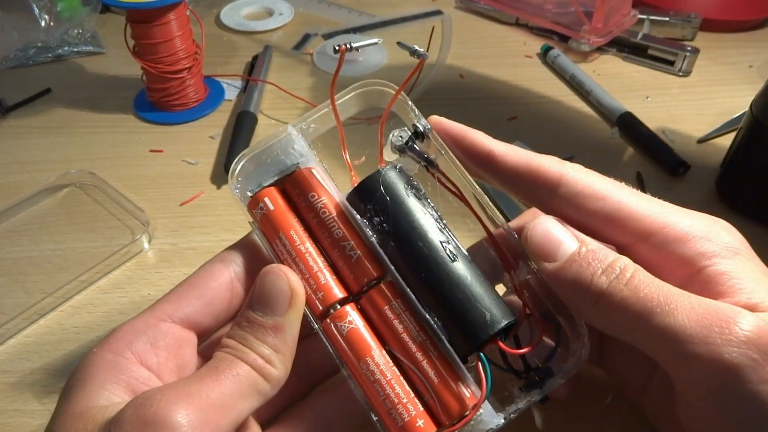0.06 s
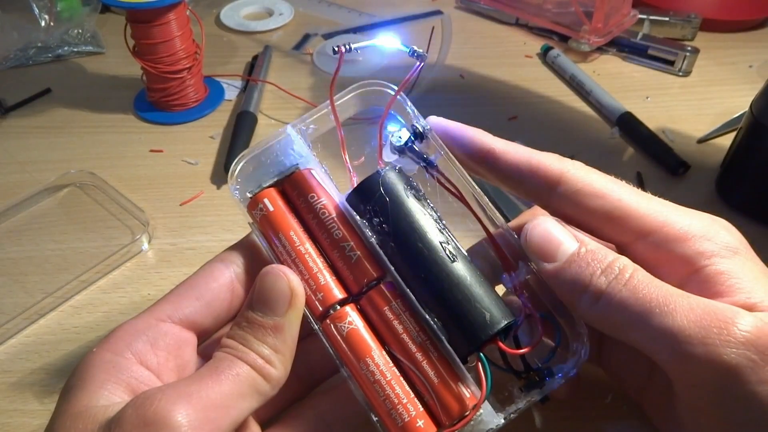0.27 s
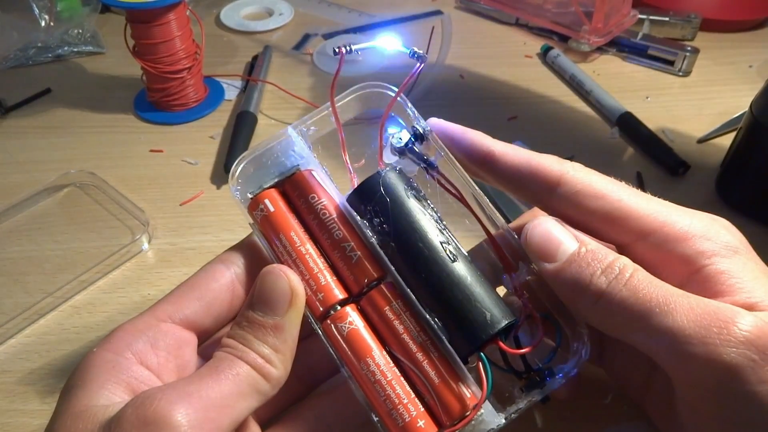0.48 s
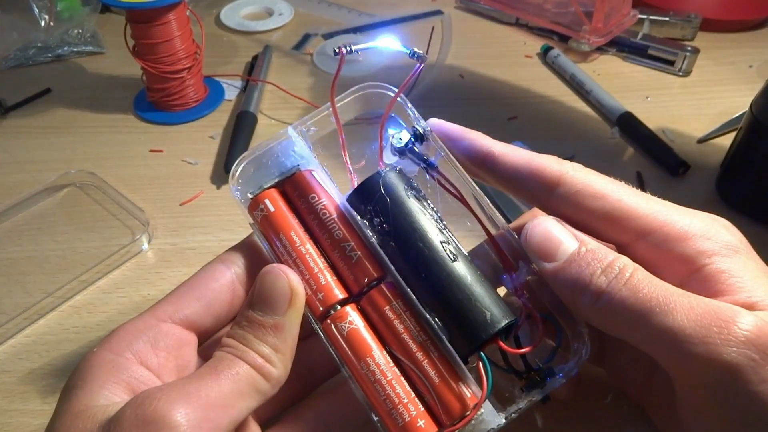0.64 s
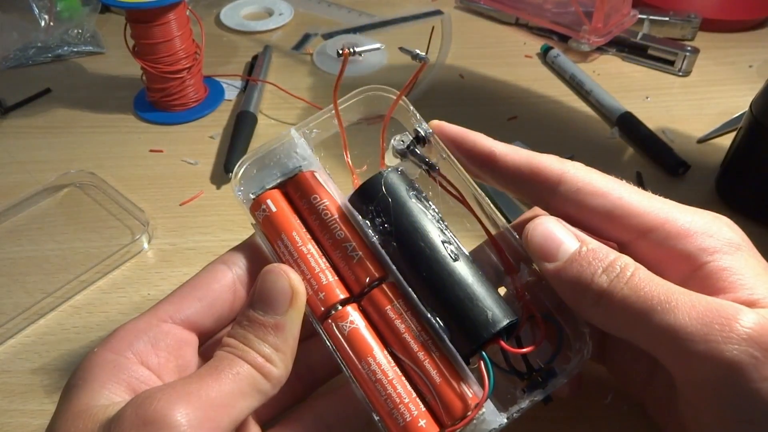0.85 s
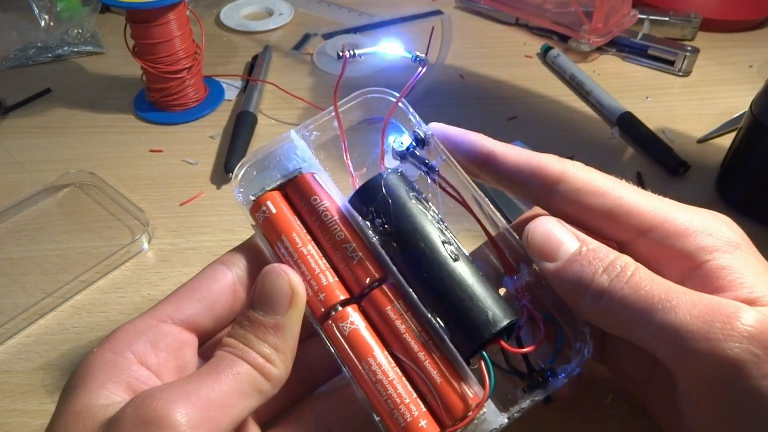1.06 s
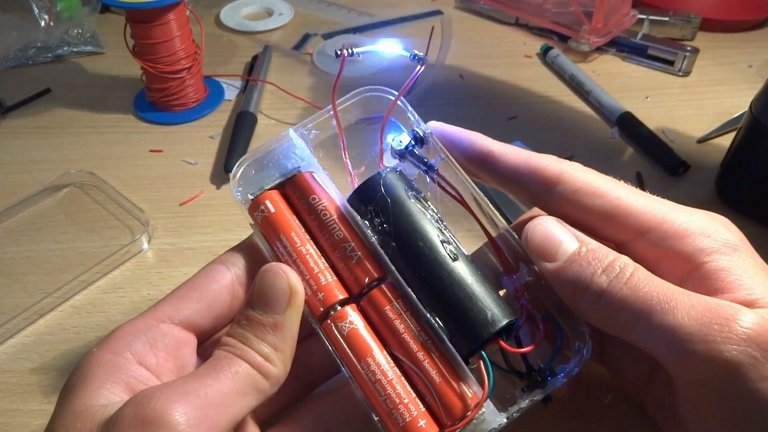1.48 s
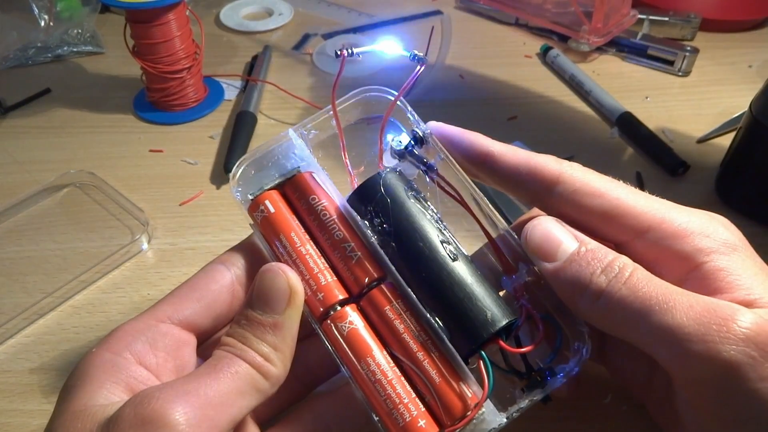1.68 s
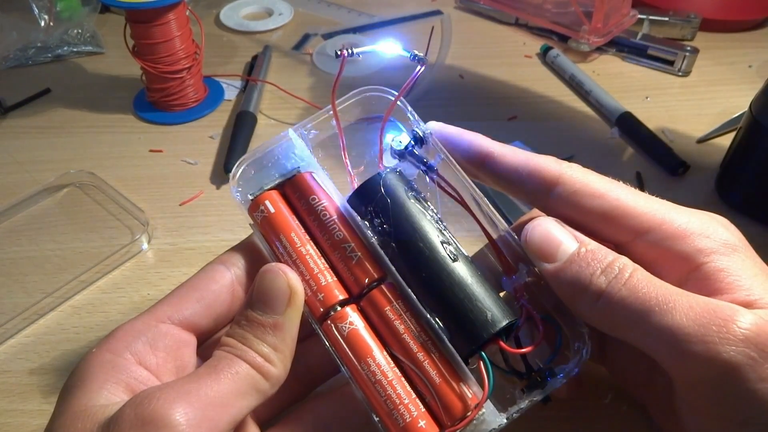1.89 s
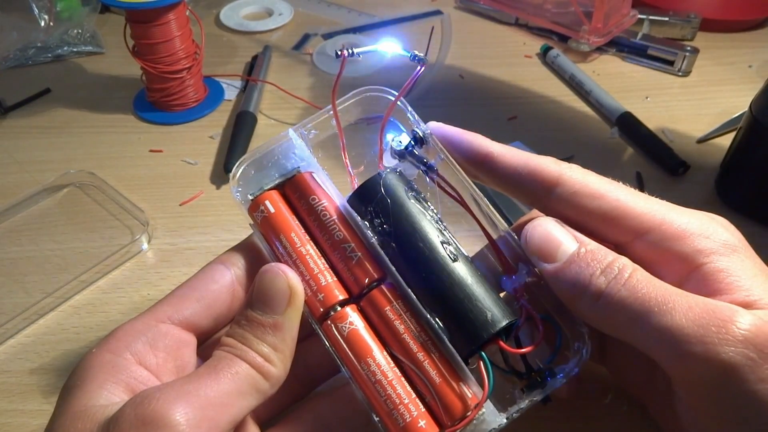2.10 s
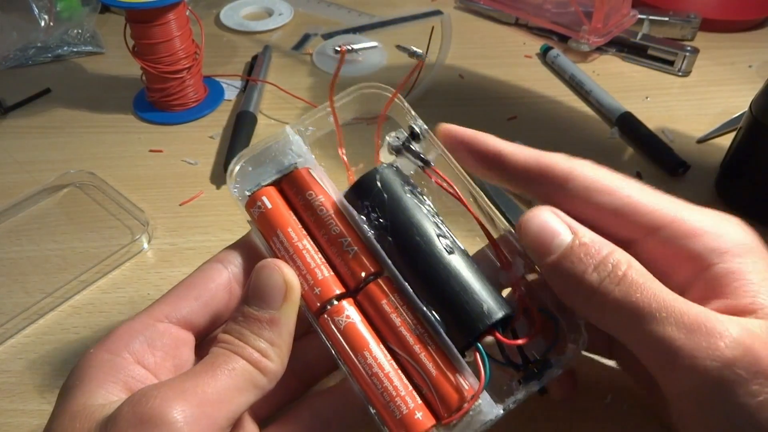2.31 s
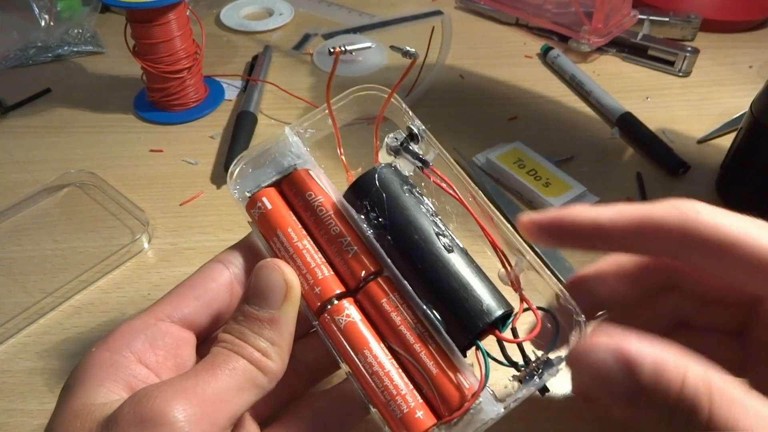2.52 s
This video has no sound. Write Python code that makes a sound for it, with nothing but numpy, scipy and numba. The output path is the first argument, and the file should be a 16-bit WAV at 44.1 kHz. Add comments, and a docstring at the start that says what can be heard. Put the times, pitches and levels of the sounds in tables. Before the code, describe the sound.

A hand-held high-voltage device arcs twice, with a loud, close, crackling electric buzz.

```python
"""A faint hum, the click of a push switch, then two bursts of buzzing sparks over a workshop bench.
A hand-held high-voltage generator charges a wire gap until the air breaks down, in an uneven train
that slows as the supply sags. Every spark cracks, echoes off bench and walls, and overloads the close
microphone with a dull thump. An automatic gain control holds the buzz down."""
import sys
import numpy as np
from scipy import signal
from scipy.fft import rfft, irfft
from scipy.io import wavfile
from numba import njit

SR = 44100
rng = np.random.default_rng(int(sys.argv[2]) if len(sys.argv) > 2 else 0)


def waveform_to_disk(signal):
    """Save audio, clipped to [-1, 1], as 16-bit WAV at the path in sys.argv[1]."""
    frames = np.transpose(np.atleast_2d(signal))
    scaled = np.clip(frames, -1, 1) * 32767
    samples = np.round(scaled).astype(np.int16)
    wavfile.write(sys.argv[1], SR, samples)


N = 116865


def undb(db):
    """Decibels to an amplitude ratio."""
    return 10 ** (np.asarray(db) / 20)


def unit(x):
    """Normalisation to an energy of one."""
    return x / np.sqrt(np.sum(x ** 2))


def decay(t, t60):
    """Exponential damping: 60 dB down after t60 seconds."""
    return np.exp(-np.log(1000) * t / t60)


def colour(x, points):
    """Minimum-phase filter through (Hz, dB) points, made causal by folding the cepstrum."""
    size = 2 ** 18
    f = np.arange(size // 2 + 1) * SR / size
    hz, db = np.array(points).T
    curve = np.interp(np.log(f + 1), np.log(hz), db)
    cepstrum = irfft(np.log(undb(curve)))
    cepstrum[1:size // 2] *= 2
    cepstrum[size // 2 + 1:] = 0
    return irfft(rfft(x, size) * np.exp(rfft(cepstrum)))[..., :N]


def band(x, hz, width):
    """Second-order resonance, with its bandwidth in Hz."""
    return signal.lfilter(*signal.iirpeak(hz, hz / width, fs=SR), x)


def stereo(envelope, side_db):
    """Partly coherent noise under an envelope: the weaker the side signal, the more alike the ears."""
    mid, side = rng.standard_normal((2, N)) * envelope
    return unit(mid) + undb(side_db) * unit(side) * np.array([[1], [-1]])


def convolve(x, response):
    """Convolution with a two-channel impulse response."""
    return signal.fftconvolve(np.atleast_2d(x), response, axes=1)[:, :N]


def add(out, start, x):
    """Superposition of a short sound at a start time in seconds."""
    i = int(round(start * SR))
    out[..., i:i + x.shape[-1]] += x[..., :N - i]


# Bands of the room hum. Each row: centre in Hz, nominal width in Hz, relative level in dB.
HUM_BANDS = [(350, 50, 0), (474, 20, -1), (1190, 50, -6), (1550, 140, -13)]
HUM_DB, HISS_DB, FLOOR_DB, HUM_END_S = -54, -58, -80, 0.23

def background():
    """Ambient noise: narrow-band hum and broadband hiss fade as the arc strikes; a low floor stays."""
    t = np.arange(N) / SR
    hum = sum(undb(db) * band(band(stereo(1, 2), hz, 2 * width), hz, 2 * width)
              for hz, width, db in HUM_BANDS)
    hiss = colour(stereo(1, -2.5), [(60, 5), (200, 4.5), (1800, 1.5), (3000, -8.5), (10000, -14)])
    floor = colour(stereo(1, -12), [(30, 27), (100, 0), (300, -5), (1500, -17), (10000, -40)])
    fade = 1 / (1 + (t / HUM_END_S) ** 20)
    opening = fade * (undb(HUM_DB) * unit(hum) + undb(HISS_DB) * unit(hiss))
    return np.sqrt(2 * N) * (opening + undb(FLOOR_DB) * unit(floor))


# Reflections off case, bench and wall. Each row: delay in seconds, relative level in dB.
REFLECTIONS = [(.00054, -23), (.00095, -31), (.0018, -9.5), (.00207, -12), (.0027, -7), (.0052, -15.5),
               (0.0126, -5.5)]
# Modes of the plastic case. Each row: frequency in Hz, level in dB, 60 dB decay time in seconds.
CASE_MODES = [(2538, -28.5, 0.017), (2873, -20, 0.0096), (3606, -28.5, 0.023), (3672, -28.5, .04),
              (4897, -25, 0.018), (7520, -34.5, .025), (8050, -29.5, 0.067), (9500, -26, 0.054),
              (10100, -21.5, .02)]
# Spectra of the reflections and of the room tail. Each row: frequency in Hz, gain in dB.
REFLECTION_SPECTRUM = [(200, -31.5), (800, 0), (1700, -2), (2500, -4), (4500, 1.5), (6500, -3), (8000, 3),
                       (10000, 2)]
TAIL_SPECTRUM = [(150, -52), (500, -44.5), (1000, -16.5), (1600, -9.5), (3000, -6), (4700, -2), (7000, 0.5),
                 (10000, 2.5)]
CLUTTER_S, TAIL_BUILD_S = 0.0039, 0.036
BRIGHT_DB, BRIGHT_T60_S, LOW_DB, LOW_T60_S = 6, 0.33, -10.5, .27

def workshop():
    """Impulse response: reflections, scatter off clutter, case modes and a tail whose lows die first."""
    t = np.arange(N) / SR
    near = stereo(t * np.exp(-2 * t / CLUTTER_S), side_db=-8)
    for delay, db in REFLECTIONS:
        add(near, delay, np.array([undb(db)]))
    case = sum(undb(db) * np.sin(2 * np.pi * hz * t) * decay(t, t60) for hz, db, t60 in CASE_MODES)
    build = 1 - np.exp(-t / TAIL_BUILD_S)
    bright = colour(stereo(build * decay(t, BRIGHT_T60_S), side_db=-11), TAIL_SPECTRUM)
    low = band(stereo(build * decay(t, LOW_T60_S), side_db=-11), hz=800, width=800)
    return colour(near, REFLECTION_SPECTRUM) + case + undb(BRIGHT_DB) * bright + undb(LOW_DB) * low


# Clicks of the push switch. Each row: start in seconds, relative level in dB.
SWITCH_CLICKS = [(0.2293, 0), (1.0681, -17.5)]
# Its modes. Each row: frequency in Hz, relative level in dB, 60 dB decay time in seconds.
SWITCH_MODES = [(972, -12.5, 0.0039), (1547, -22, 0.0097), (2370, -19.5, 0.0077), (3100, -26.5, 0.0066),
                (7560, -27, .003)]

def switch(response):
    """Impact excitation of damped modes: the button snaps shut with a light tick before each burst."""
    t = np.arange(SR // 20) / SR
    ring = sum(undb(db) * np.cos(2 * np.pi * hz * t) * decay(t, t60) for hz, db, t60 in SWITCH_MODES)
    clicks = np.zeros(N)
    for start, db in SWITCH_CLICKS:
        add(clicks, start, undb(db) * ring)
    direct = colour(clicks, [(200, -17), (800, -2), (3000, -7), (10000, -7)])
    return direct + undb(-12) * convolve(direct, response)


# Bursts of the arc. Each row: first spark in seconds, last spark in seconds.
BURST_SPANS = [(.2448, .7796), (1.0816, 2.289)]
# Firing rate. Each row: time in seconds, sparks per second, scatter as a fraction of the interval.
SPARK_RATE = [(0.27, 126.8, 0.067), (0.332, 97.4, 0.072), (0.422, 85.3, 0.097), (0.512, 85.0, 0.14),
              (0.61, 73.2, 0.068), (0.731, 73.9, 0.081), (1.141, 84.2, 0.16), (1.299, 80.0, 0.12),
              (1.481, 73.5, 0.076), (1.619, 69.6, 0.1), (1.769, 63.2, 0.046), (1.93, 63.8, 0.077),
              (2.069, 65.2, 0.091), (2.221, 62.5, 0.045)]
# Loud pops, where the gap breaks down early. Each row: time in seconds, relative thump level in dB.
EARLY_POPS = [(.2921, 3), (.3742, 4), (.4445, 7), (.5448, 4), (.5524, 5), (.6314, 3), (.6833, 4),
              (1.1599, 7), (1.2365, 4), (1.262, 6), (1.2963, 3), (1.3502, 3), (1.3755, 3), (1.3986, 8),
              (1.5504, 2), (1.6183, 7), (1.786, 2), (2.0195, 3), (2.1449, 2)]
# Build-up of strength in each burst. Each row: time in seconds, crack gain in dB, thump gain in dB.
SPARK_STRENGTH = [(.245, -3.5, -1.5), (.32, 1, 2), (.55, 1, 2), (.78, 1.5, 4), (1.08, -2.5, -4),
                  (1.2, -2, -1.5), (1.6, 0.5, 1.5), (1.85, -.5, 0.5), (2.29, -0.5, 0.5)]
EARLY_FRACTION, REFERENCE_HZ = .72, 68.2
CRACK_SCATTER_DB, THUMP_SCATTER_DB = 2.08, 1.1

def spark_train():
    """Relaxation oscillation: the gap recharges and fires. Returns times, crack gains, thump gains."""
    rate_times, rates, scatter = np.array(SPARK_RATE).T
    sparks = []
    for first, last in BURST_SPANS:
        sparks.append((first, 1, 1))
        start = first
        pops = [pop for pop in EARLY_POPS if first < pop[0] < last]
        for end, pop_db in pops + [(last, None)]:
            rate = np.interp((start + end) / 2, rate_times, rates)
            final_interval = 1 if pop_db is None else EARLY_FRACTION
            count = max(1, int(round((end - start) * rate + 1 - final_interval)))
            jitter, crack_jitter, thump_jitter = rng.standard_normal((40, 3))[:count].T
            intervals = np.exp(np.interp(start, rate_times, scatter) * jitter)
            intervals[-1] = final_interval
            intervals *= (end - start) / intervals.sum()
            wait = intervals * REFERENCE_HZ  # a longer wait: a louder crack, a lighter thump
            crack = wait ** .5 * undb(CRACK_SCATTER_DB * crack_jitter)
            thump = wait ** -.25 * undb(THUMP_SCATTER_DB * thump_jitter)
            if pop_db is not None:
                thump[-1] = undb(pop_db)
            sparks += zip(start + np.cumsum(intervals), crack, thump)
            start = end
    times, crack_gains, thump_gains = np.array(sparks).T
    strength_times, crack_db, thump_db = np.array(SPARK_STRENGTH).T
    crack_gains *= undb(np.interp(times, strength_times, crack_db))
    thump_gains *= undb(np.interp(times, strength_times, thump_db))
    return times, crack_gains, thump_gains


# Overload pulse, left then right. Each row: least delay, rise time and nominal fall time, in seconds.
THUMP_PULSES = [(0.00046, 0.00005, 0.001), (0.00003, 0.000027, 0.00095)]
THUMP_DB, THUMP_LAG_S, LOW_CUT_HZ = -10.5, 0.00034, 15
SWING_DEPTH, SWING_S = 0.2, 0.0035

def microphone_thumps(times, gains):
    """Overload recovery: each spark jolts both microphones, which swing back past rest and settle."""
    t = np.arange(SR // 40) / SR
    swing = SWING_DEPTH * t / SWING_S * np.exp(1 - t / SWING_S)
    thumps = np.zeros((2, N))
    for start, gain in zip(times, gains):
        for channel, (delay, rise, fall) in zip(thumps, THUMP_PULSES):
            stretch, lag = rng.standard_normal(2)
            recovery = fall * np.exp(.12 * stretch) / gain ** 0.1  # heavier thumps are shorter
            pulse = (1 - np.exp(-t / rise)) * np.exp(-t / recovery)
            add(channel, start + delay + THUMP_LAG_S * abs(lag), gain * (pulse / pulse.max() - swing))
    low_cut = signal.butter(2, LOW_CUT_HZ, "high", fs=SR, output="sos")
    return undb(THUMP_DB) * signal.sosfilt(low_cut, thumps)


# Spectra of a spark's snap and of its fizz. Each row: frequency in Hz, relative gain in dB.
SNAP_SPECTRUM = [(200, 9.5), (600, -9), (1300, -5.5), (1750, -31), (2500, -5), (5000, -1), (10000, -6)]
FIZZ_SPECTRUM = [(200, 0), (600, 6), (900, 6), (1300, 4), (1900, -4), (2600, 0), (4000, 0), (10000, -2)]
SNAP_DB, FIZZ_DB, ECHO_DB = 5, -1, 1
FIZZ_S, REBOUND_DEPTH, REBOUND_S = .001, 0.18, .0001

def spark_cracks(times, gains, response):
    """Dielectric breakdown: each spark sends out a pressure impulse, which echoes, and a brief fizz."""
    t = np.arange(SR // 40) / SR
    impulses, noise = np.zeros(N), np.zeros((2, N))
    for start, gain in zip(times, gains):
        add(impulses, start, np.array([-gain]))
        add(noise, start, gain * unit(rng.standard_normal((2, len(t))) * np.exp(-t / FIZZ_S)))
    rebound = REBOUND_DEPTH * np.roll(impulses, int(round(REBOUND_S * SR)))
    snaps = undb(SNAP_DB) * colour(impulses - rebound, SNAP_SPECTRUM)
    fizz = undb(FIZZ_DB) * colour(noise, FIZZ_SPECTRUM)
    return snaps + fizz + undb(ECHO_DB) * convolve(impulses, response)


def scene():
    """Superposition of background, switch and arc; one spark train drives both thumps and cracks."""
    response = workshop()
    quiet_sounds = background() + switch(response)
    times, crack_gains, thump_gains = spark_train()
    thumps = microphone_thumps(times, thump_gains)
    return quiet_sounds + thumps + spark_cracks(times, crack_gains, response)


@njit
def follow(x, attack_s, release_s):
    """Envelope detection: one-pole smoothing with separate time constants for rise and fall."""
    out, level = np.empty(len(x)), 0.
    for i in range(len(x)):
        level += (x[i] - level) / (SR * (attack_s if x[i] > level else release_s))
        out[i] = level
    return out


THRESHOLD_DB, RATIO, ATTACK_S, RELEASE_S = -17, 2.06, 0.003, 0.013
CLIP_LEVEL, TOP_HZ = .65, 10380

def record(dry):
    """Dynamic compression holds the buzz down; saturation rounds the peaks and the top is cut steeply."""
    level = follow(np.abs(dry).mean(0), ATTACK_S, RELEASE_S)
    gain = np.maximum(level / undb(THRESHOLD_DB), 1) ** (1 / RATIO - 1)
    gentle_cut = signal.butter(4, TOP_HZ + 1500, fs=SR, output="sos")
    steep_cut = signal.ellip(12, .2, 80, TOP_HZ, fs=SR, output="sos")
    compressed = signal.sosfilt(gentle_cut, dry * gain)
    return signal.sosfilt(steep_cut, CLIP_LEVEL * np.tanh(compressed / CLIP_LEVEL))


dry = scene()
out = record(dry)
waveform_to_disk(out)
```